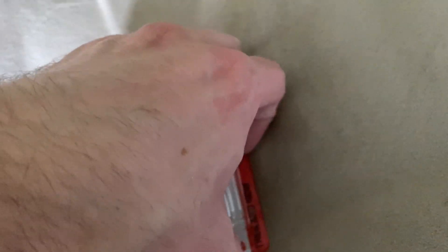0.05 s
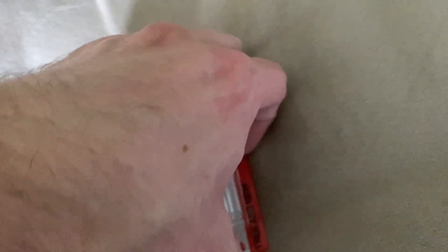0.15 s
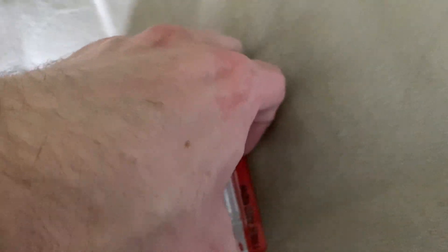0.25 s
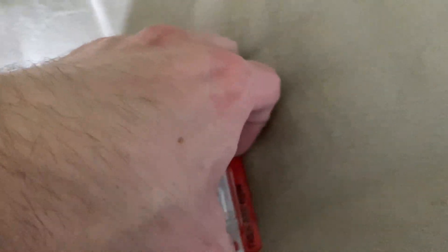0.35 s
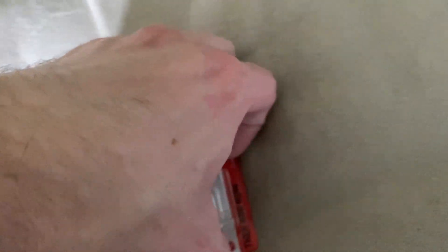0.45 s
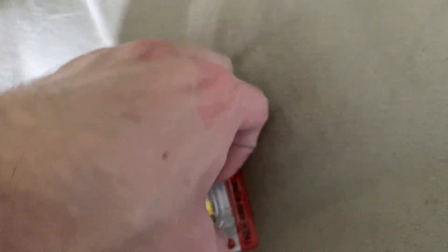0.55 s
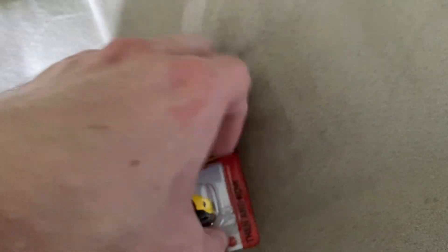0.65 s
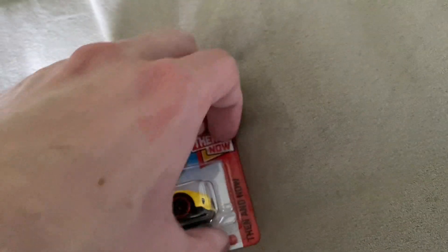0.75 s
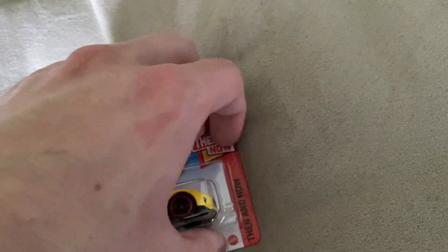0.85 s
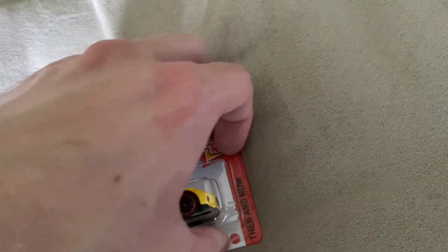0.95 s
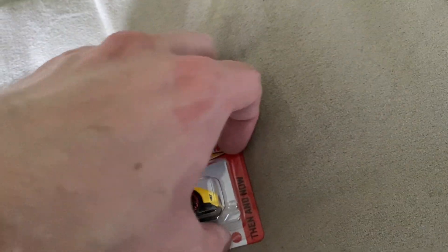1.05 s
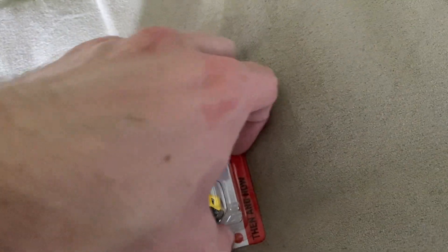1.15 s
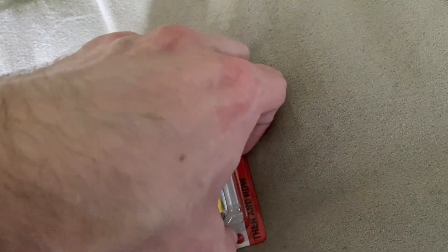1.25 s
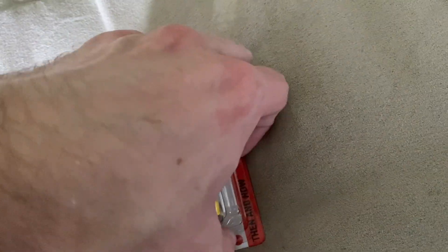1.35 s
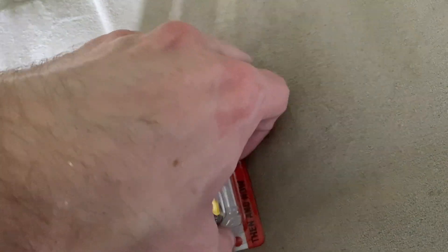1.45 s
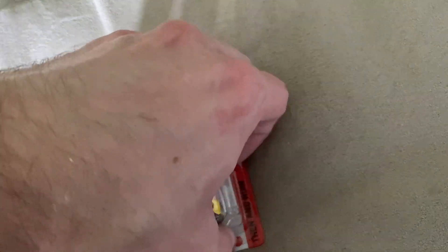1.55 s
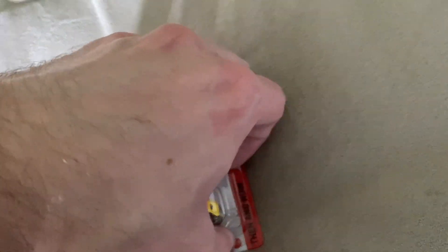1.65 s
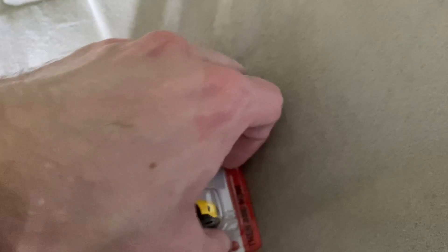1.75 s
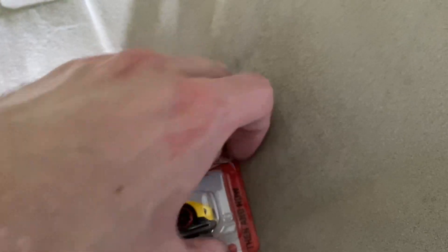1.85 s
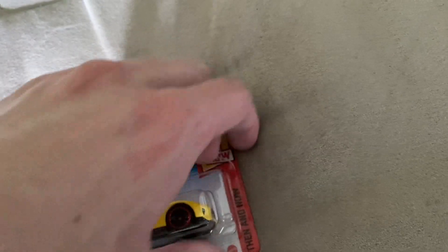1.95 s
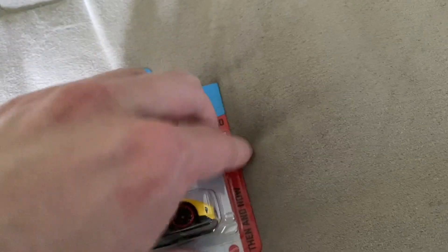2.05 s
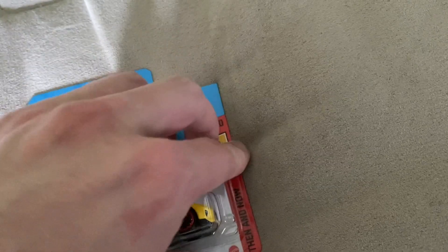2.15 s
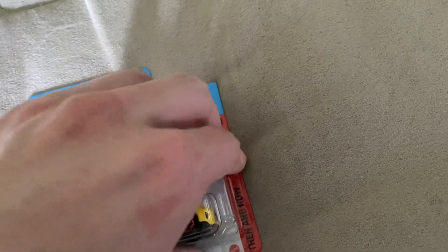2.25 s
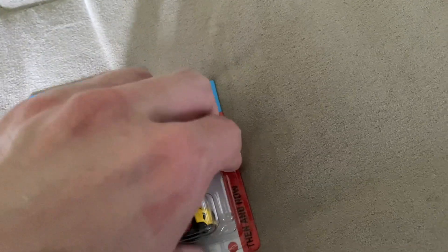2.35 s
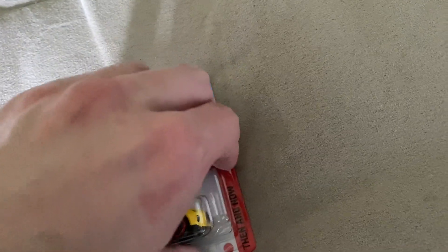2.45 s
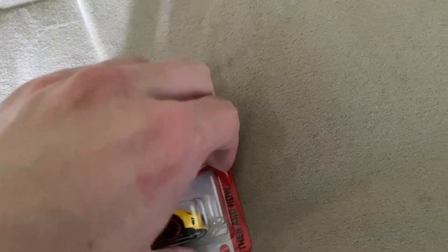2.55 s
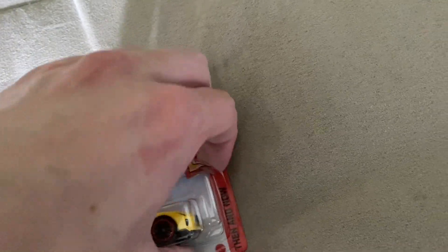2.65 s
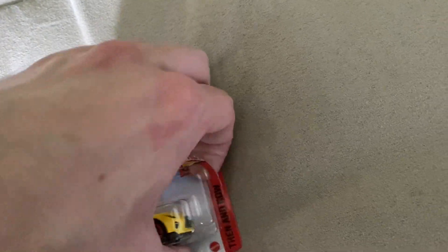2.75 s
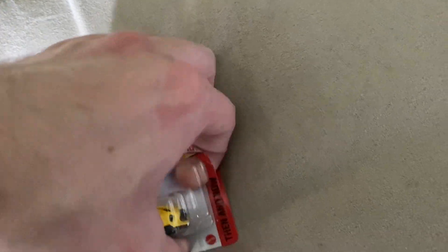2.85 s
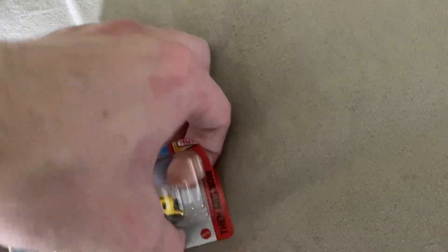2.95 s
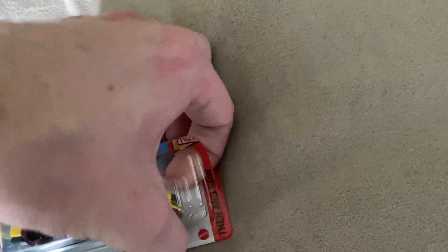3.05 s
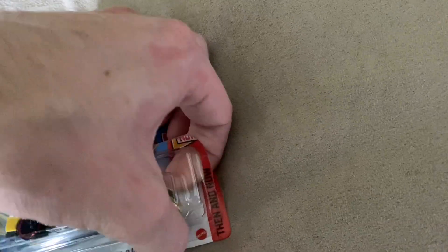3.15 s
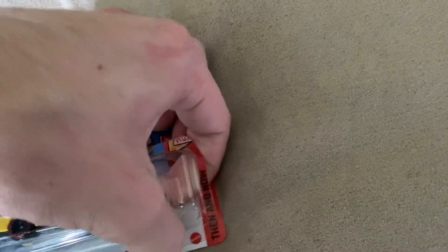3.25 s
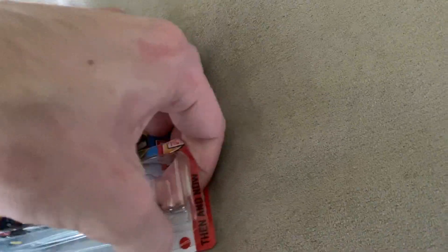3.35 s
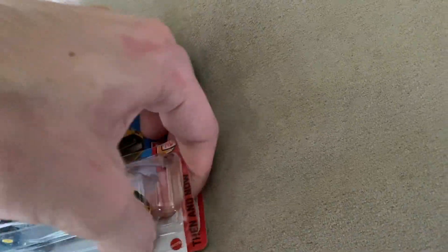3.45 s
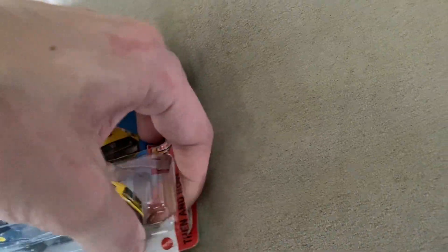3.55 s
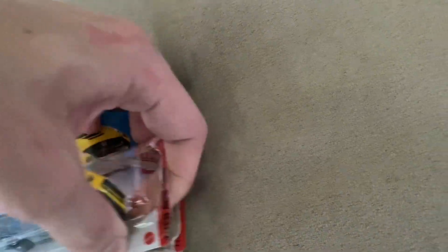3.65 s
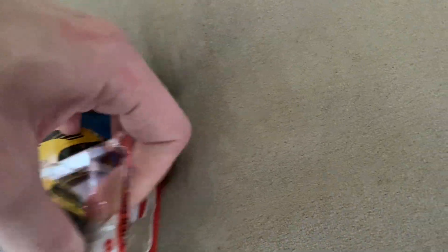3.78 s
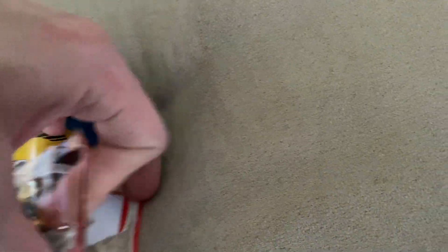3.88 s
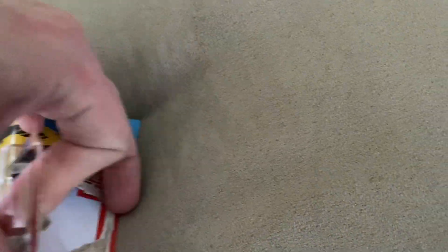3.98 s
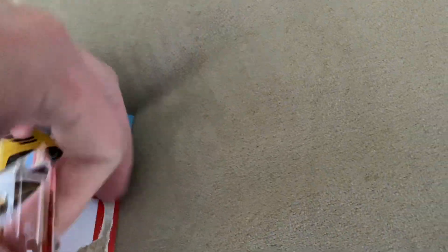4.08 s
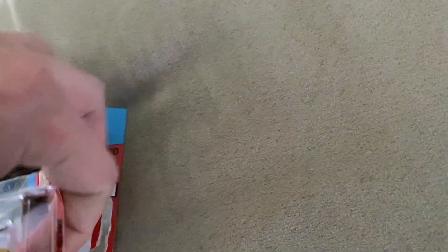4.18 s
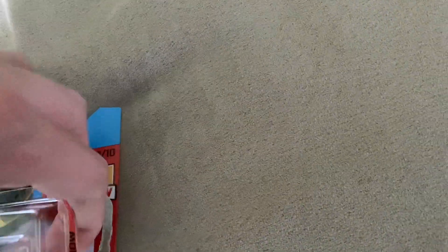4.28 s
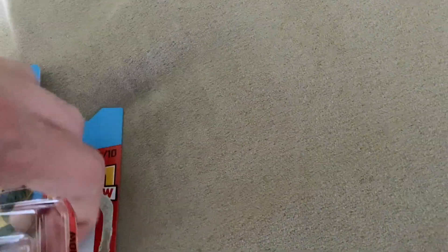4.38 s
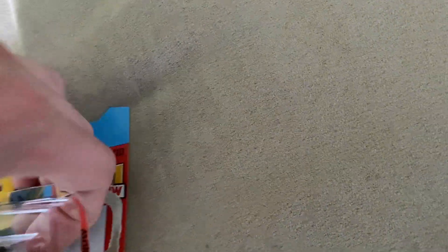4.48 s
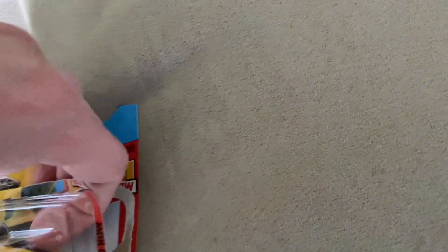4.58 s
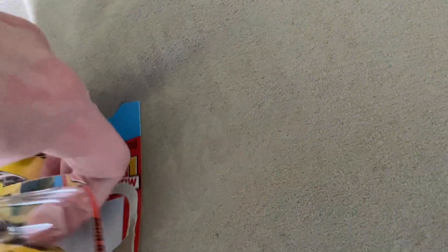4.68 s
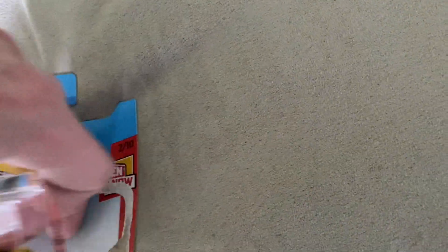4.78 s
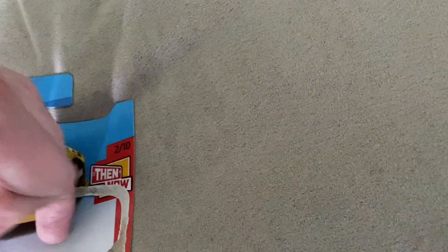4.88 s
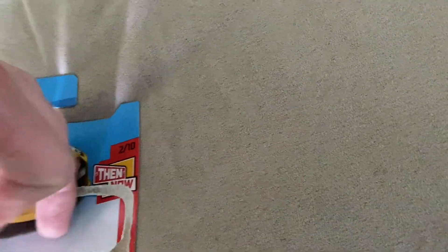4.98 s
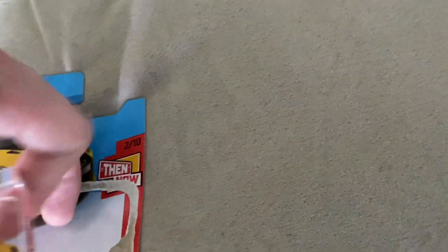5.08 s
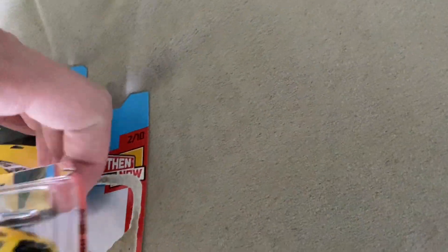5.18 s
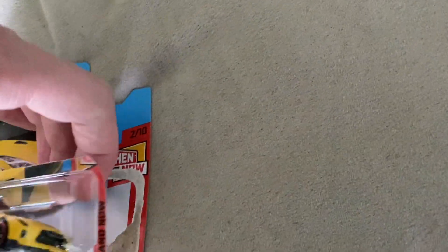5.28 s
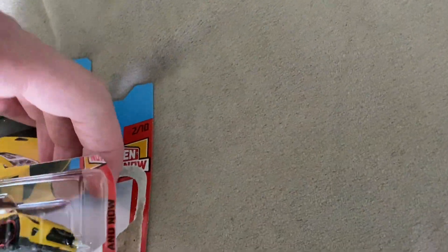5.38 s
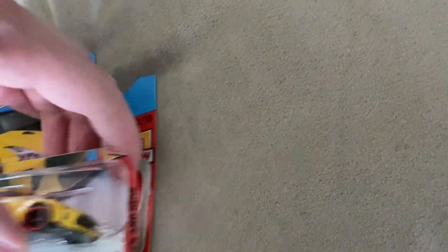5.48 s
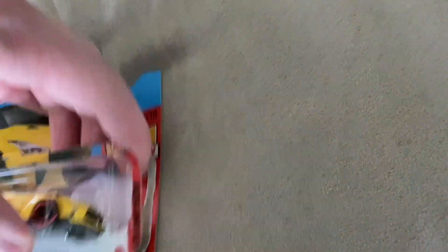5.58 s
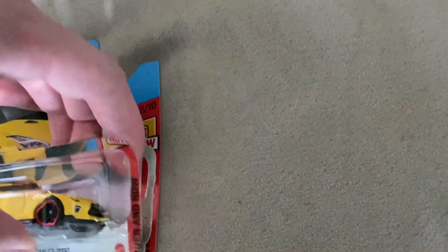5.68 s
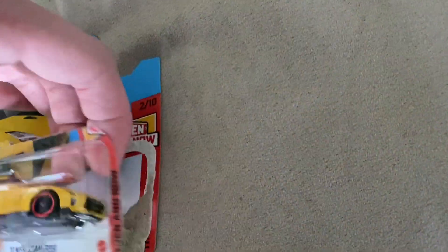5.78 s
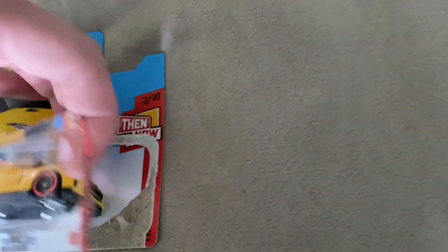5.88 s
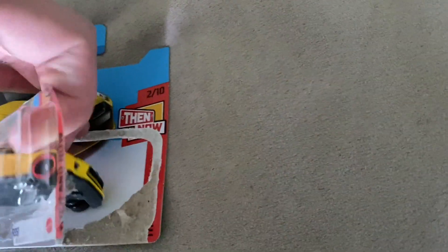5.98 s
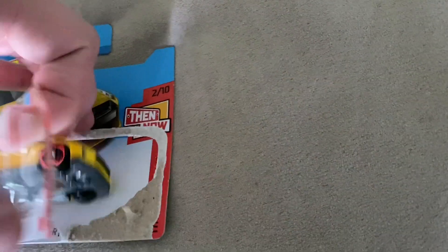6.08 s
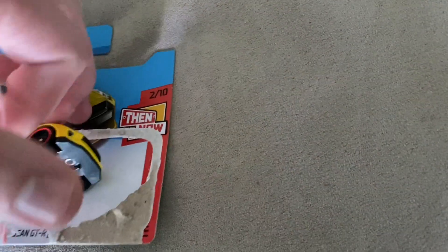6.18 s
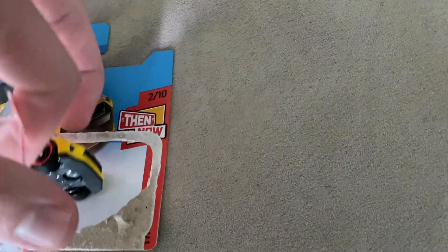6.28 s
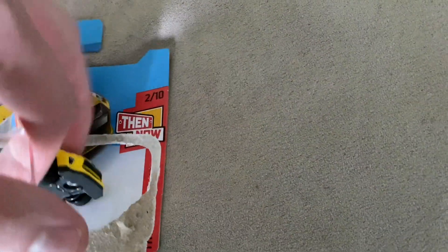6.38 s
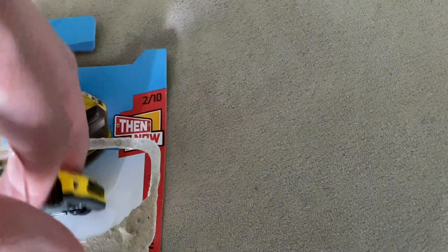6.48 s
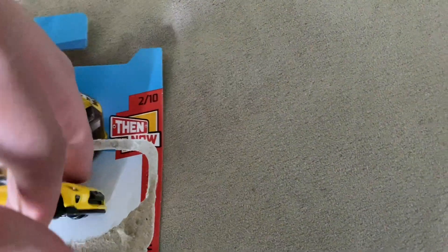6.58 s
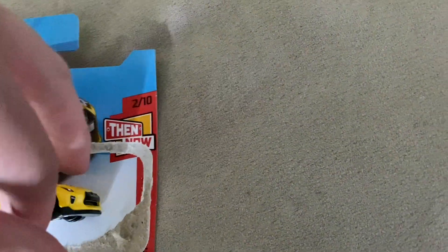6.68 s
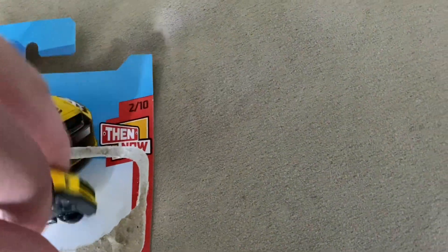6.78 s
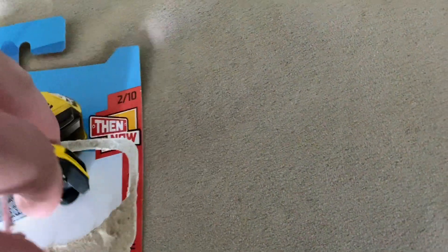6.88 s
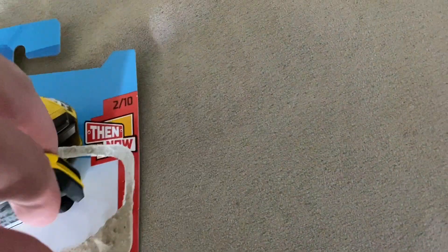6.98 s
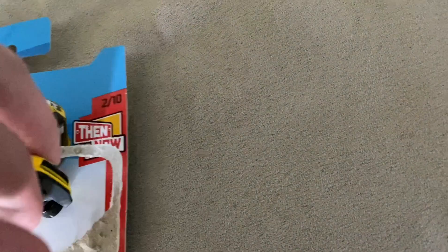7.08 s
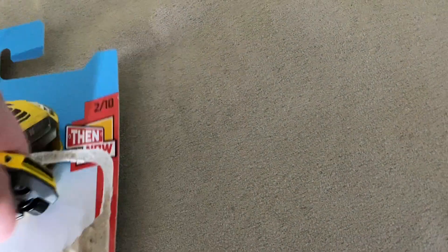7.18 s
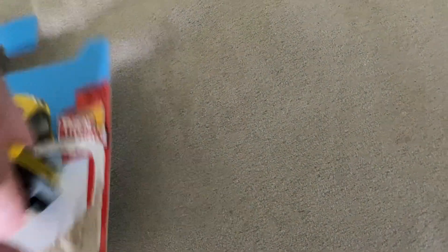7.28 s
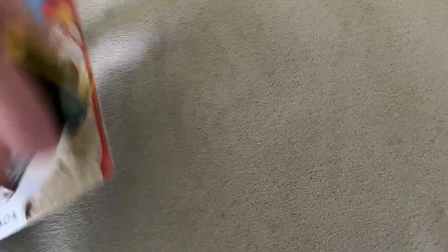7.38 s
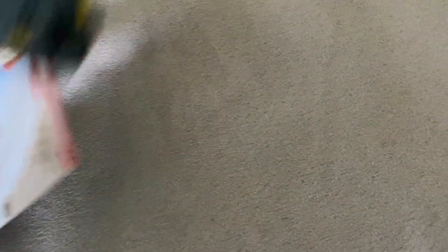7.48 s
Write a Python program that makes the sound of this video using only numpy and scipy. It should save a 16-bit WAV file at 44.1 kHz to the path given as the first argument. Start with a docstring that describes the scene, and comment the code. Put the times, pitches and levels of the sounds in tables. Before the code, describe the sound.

In a small furnished room, a stiff plastic blister is peeled from its cardboard backing right beside the microphone. An early crack and scattered ticks give way to creaking, tearing and crackling, with the loudest snap a little past halfway. The opened plastic then rubs and crinkles more softly, skin squeaks on it briefly, and a quick scrape with several snaps ends it. Faint low bumps sit underneath.

```python
"""A small furnished room: on the carpet, a hand's width from a phone, fingers peel a plastic blister off
its cardboard backing. Glue line and plastic let go in snaps and creaks that run through the sheets as
bending waves, treble first; the card rings under the hardest snaps. Fibres and skin rustle, skin squeaks
and the opened blister sings when rubbed. The phone thuds faintly in the hand, and the room answers."""
import sys
import numpy as np
from scipy import signal
from scipy.fft import rfft, irfft, next_fast_len
from scipy.io import wavfile
from scipy.ndimage import uniform_filter1d

SR = 44100
rng = np.random.default_rng(int(sys.argv[2]) if len(sys.argv) > 2 else 0)


def dump_mix(stems):
    """Bounce the given channels to the path in sys.argv[1] as a 16-bit WAV at rate SR."""
    frames = np.atleast_2d(stems).T  # one column per channel
    limited = np.clip(frames, -1, 1)  # hard clip at full scale
    pcm = np.round(limited * 32767).astype(np.int16)
    wavfile.write(sys.argv[1], SR, pcm)


N = 332205
HOP = 32  # samples per step of a power envelope


def undb(db):
    """dB to gain."""
    return 10 ** (np.asarray(db) / 20)


def unit(x):
    """Scale to rms 1."""
    return x / np.sqrt(np.mean(x ** 2))


def on_log(hz, table):
    """Read (f/Hz, value) rows on a log-frequency axis."""
    table_hz, values = np.transpose(table)
    return np.interp(np.log(hz + 1), np.log(table_hz + 1), values)


def curves(table):
    """Columns of a (t/s, ...) table, one value per sample."""
    times_s, *columns = np.transpose(table)
    return [np.interp(np.arange(N) / SR, times_s, column) for column in columns]


def shaped(x, response):
    """Filter by a complex response of frequency."""
    size = next_fast_len(x.shape[-1] + 8192)
    return irfft(rfft(x, size) * response(np.fft.rfftfreq(size, 1 / SR)), size)[..., :x.shape[-1]]


def ring(hz, centre_hz, width_hz):
    """Resonance with gain 1 at its centre."""
    return 1j * hz * width_hz / (centre_hz ** 2 - hz ** 2 + 1j * hz * width_hz)


def registers(hz, edges_hz):
    """Smooth split of the spectrum at the given edges."""
    below = [0] + [1 / (1 + (hz / edge) ** 8) for edge in edges_hz] + [1]
    return [upper - lower for lower, upper in zip(below, below[1:])]


def flutter(rate_hz):
    """Random levels joined by ramps."""
    hold = int(SR / rate_hz)
    return uniform_filter1d(np.repeat(rng.standard_normal(N // hold + 1), hold), hold)[:N]


def after(s):
    """0 before time s, then a 20 ms ramp to 1."""
    return np.clip((np.arange(N) / SR - s) / .02, 0, 1)


def swell(s, hold_s, rise_db_s, fall_db_s):
    """Power per hop: climbs to 1 at time s, holds, dies away, straight in dB."""
    t = np.arange(0, N, HOP) / SR
    return undb(-2 * (rise_db_s * np.maximum(s - t, 0) + fall_db_s * np.maximum(t - s - hold_s, 0)))


def to_gain(power):
    """Power per hop to gain per sample."""
    return np.interp(np.arange(N), np.arange(0, N, HOP), np.sqrt(power))


def add(out, s, sound):
    """Mix in at time s, early by half the bending wave's travel time."""
    start = max(int((s - BEND_MS / 2000) * SR), 0)
    out[start:start + len(sound)] += sound[:len(out) - start]


# Room noise spectrum: f/Hz, relative level/dB
AIR_SPECTRUM = [(18, -45.5), (30, -18), (64, 2), (93, -24.5), (199, -14), (252, -36), (287, -25.5),
                (461, -36), (16000, -56)]

def air(level_db=-69.5):
    """The quiet of the room: bass alike in both microphone ports, treble apart."""
    noise = rng.standard_normal((2, N))
    mid, side = shaped(noise, lambda hz: undb(on_log(hz, AIR_SPECTRUM)) * [hz ** 0, hz / (hz + 900)])
    return undb(level_db) * unit(mid + side * np.array([[1], [-1]]))


# Room decay: f/Hz, T60/s
ROOM_DECAY = [(200, 0.12), (1000, 0.12), (4000, 0.15), (12000, 0.36)]

def room(x, level_db=-37.5, onset_ms=1, size=22050):
    """Reflections: a decaying noise tail for each port, treble lasting longest."""
    t, tail = np.arange(size) / SR, 0
    for centre_hz in 125 * 2. ** np.arange(8):
        noise = shaped(rng.standard_normal((2, size)), lambda hz: ring(hz, centre_hz, centre_hz) ** 2)
        noise += (noise.mean(axis=0) - noise) * min(700 / centre_hz, 1.)  # long waves reach both alike
        tail = tail + noise * undb(-60 * t / on_log(centre_hz, ROOM_DECAY))
    tail *= 1 - np.exp(-(t * 1000 / onset_ms) ** 2)
    tail /= np.sqrt(np.sum(tail ** 2) / 2)
    return undb(level_db) * signal.fftconvolve(x[None], tail, axes=1)[:, :N]


# Port balance, before and after the pack slides: f/Hz, left minus right/dB
BALANCES = [(60, 0.0), (110, 0.0), (200, 0.0), (380, 0.0), (700, 2.0), (1290, 0.0), (2380, -1.0),
            (4400, -1.5), (8120, 0.0), (15000, 0.0)], [(60, 0.0), (110, -0.5), (200, -0.5), (380, -1.0),
            (700, 1.0), (1290, -1.0), (2380, -2.0), (4400, 1.0), (8120, 0.0), (15000, 0.0)]
# Port phase, likewise: f/Hz, left lead/rad
PHASES = ([(60, -.2), (250, -.6), (1000, -.6), (2400, -.4), (3800, -2.1), (4700, -2.2), (5700, 2.2),
          (8300, 2.6), (11600, 3.5), (15500, 4.8)], [(60, -.2), (250, -.5), (1000, -.6), (2500, -.5),
          (3050, -1.5), (3500, -.5), (5300, -.3), (5900, 1.5), (8300, 2.6), (11600, 3.5), (15500, 4.8)])

def ports(x, slide_s=3.5):
    """Two ports hear the pack with a balance and phase that change as it slides aside."""
    out, side, moved = 0, np.array([[.5], [-.5]]), after(slide_s)
    for share, balance, phase in zip((1 - moved, moved), BALANCES, PHASES):
        out += shaped(x * share,
                      lambda hz: undb(side * on_log(hz, balance)) * np.exp(1j * side * on_log(hz, phase)))
    return out


# Resting fingers: t/s, relative rustle/dB, tilt/(dB/register), phone tremor/dB
RESTING_GRIP = [(0, -83, -8, -61), (.14, -68, -8.5, -63.5), (.3, -72, -9, -64), (.6, -60.5, -4.5, -71),
                (.8, -65, -8.5, -72), (1.2, -76, -4.5, -72.5), (1.5, -71, -9.5, -63), (2.1, -61.5, -5, -64),
                (2.45, -61.5, 3.5, -80.5), (2.75, -54.5, -3.5, -70.5), (3.3, -48, 3.5, -50.5),
                (3.95, -51.5, -5, -63.5), (4.42, -59, -3, -63), (4.9, -64.5, -3.5, -62.5),
                (5.2, -68.5, 2.5, -71), (5.38, -72.5, 6, -81), (5.6, -51, -1.5, -59),
                (6.1, -62.5, 0.5, -68), (6.6, -59, -5.5, -71.5), (7.04, -83.5, -14.5, -67.5),
                (7.19, -75, .3, -56.5), (7.53, -78, -1, -64)]
# Hand thuds on the phone: t/s, level/dB
HAND_THUDS = [(.45, -50.5), (.71, -57), (0.901, -56), (1.64, -66.5), (1.78, -54.5), (2.23, -67),
              (2.272, -44.5), (2.32, -60), (2.66, -52), (3.45, -54.5), (3.58, -56.5), (4.03, -47.5),
              (4.25, -51), (4.53, -57), (4.65, -54.5), (4.96, -54), (5.03, -56.5), (5.43, -53),
              (5.56, -48.5), (6.5, -53), (6.771, -50.5), (7.38, -64)]

def handling():
    """Low tremor and thuds that the hand passes to the case, alike in both ports."""
    rumble = shaped(rng.standard_normal(N), lambda hz: ring(hz, 71, 64) ** 2)
    *_, tremor_db = curves(RESTING_GRIP)
    thuds = sum(undb(2 * db) * swell(s, 0, rise_db_s=217.5, fall_db_s=191.5) for s, db in HAND_THUDS)
    return to_gain(undb(2 * tremor_db[::HOP]) + thuds) * unit(rumble)


# Finger stops: start/s, end/s, gain/dB
FINGER_STOPS = [(2.94, 2.964, -9), (3.012, 3.029, -5), (5.191, 5.401, -3.5), (6.898, 6.935, -6.5),
                (7.023, 7.065, -11.5), (7.167, 7.198, -9.5)]

def pauses(edge_s=0.009):
    """Gain that drops while the fingers are still."""
    t = np.arange(N) / SR
    return undb(sum(db * np.clip(np.minimum(t - start, end - t) / edge_s + .5, 0, 1)
                    for start, end, db in FINGER_STOPS))


# Rubbing and tearing: t/s, hold/s, relative level/dB, tilt/(dB/register), extra card flex/dB
RUB_STROKES = [(0.347, 0.017, -56, -1, 6), (0.69, 0.0079, -57.5, -8, -3), (0.859, 0.0037, -51.5, -7, 2),
               (1.015, 0.026, -65.5, -8, -2.5), (1.361, 0.14, -59, -1, 1), (1.585, 0.015, -68, -3.5, -2.5),
               (1.753, 0.042, -58.5, 0.5, 0), (1.912, 0.11, -56, -0.5, 4), (2.112, 0.088, -62.5, 1, -14),
               (2.513, 0.18, -50.5, 1.5, 4), (2.625, 0.051, -48, 6, 20), (2.763, 0.043, -47.5, 6.5, 14.5),
               (2.89, 0.015, -53, 3, -10), (2.974, 0.0063, -48.5, 7, -5), (3.121, 0.011, -41.5, 2.5, 13),
               (3.161, 0.06, -60.5, -12, 12), (3.386, 0.032, -41, 9.5, 11), (3.599, 0.049, -55.5, -12, 7),
               (3.694, 0.16, -46.5, 8, 12.5), (4.008, 0.008, -45.5, 2, 13.5),
               (4.092, 0.064, -50.5, 3.5, 14.5), (4.239, 0.019, -44.5, -3, 1.5), (4.349, .015, -50.5, 2, 1),
               (4.499, 0.032, -45.5, 7, 9), (4.611, 0.22, -47, 6, 11), (4.952, 0.0034, -55.5, -4, 4),
               (5.052, 0.076, -65, 9.5, -9), (5.429, 0.0052, -54, -1.5, 7), (5.53, 0.024, -52.5, 0, -13),
               (5.685, 0.26, -48.5, 1.5, 1), (6.045, 0.0042, -55, -7, -1.5), (6.17, 0.13, -59.5, 4.5, -5.5),
               (6.416, 0.061, -50, 1, -9), (6.502, 0.22, -60, 2.2, -9), (6.758, 0.035, -50, -0.5, 10),
               (6.836, 0.05, -60, 3, 8), (6.981, 0.02, -61, 6.5, -11), (7.119, 0.011, -41, 3, 8.5),
               (7.245, 0.044, -43.5, 4, 4.5), (7.334, 0.038, -36.5, 3, -5), (7.363, 0.024, -33, -4.5, 1),
               (7.41, 0.021, -53, 10, -.3), (7.51, .015, -78, 10, -4), (7.53, .02, -64, -10.5, 3)]
REGISTER_DB = (-13, -4.5, -4.5, -6.5)  # card flex, card scrape, plastic scrape, fibre hiss

def rubbing(settle_db=-32, settle_tilt_db=2.5):
    """Gains of the four registers: grip, strokes and the settling after each snap add as powers."""
    step = np.arange(4)[:, None] - 1.5
    is_flex = step < -1
    grip_db, grip_tilt_db, _ = curves(RESTING_GRIP)
    power = undb(2 * (grip_db[::HOP] + step * grip_tilt_db[::HOP]))
    for s, hold_s, db, tilt_db, flex_db in RUB_STROKES:
        stroke = swell(s, hold_s, rise_db_s=302, fall_db_s=348.5)
        power += undb(2 * (db + step * tilt_db + is_flex * flex_db)) * stroke
    for s, db, *_ in PEEL_SNAPS:
        settling = swell(s, 0, rise_db_s=4200, fall_db_s=200)
        power += undb(2 * (db + settle_db + step * settle_tilt_db)) * settling
    return [undb(db) * to_gain(p) * pauses() for db, p in zip(REGISTER_DB, power)]


def sheets(hz, modes):
    """Modal response of the sheets; bending waves travel as the root of frequency, so bass comes late."""
    body = sum(undb(db) * ring(hz, centre_hz, width_hz) for centre_hz, width_hz, db in modes)
    lag_cycles = 2 * BEND_MS / 1000 * np.sqrt(1000 * hz)
    return body * np.exp(-2j * np.pi * lag_cycles)


def grains(per_s, spread_db):
    """Random tiny breaks, many small and a few large."""
    chance, sign, size = rng.random((3, N))
    size_db = np.minimum(-spread_db * np.log(1 - size), 14)
    return (chance < per_s / SR) * np.sign(sign - .5) * undb(size_db)


# Joint modes of card and blister: f/Hz, width/Hz, level/dB
PACK_MODES = [(295, 170, -8.5), (456, 230, -12.5), (648, 180, 4), (905, 520, 4.5), (1312, 550, -1),
              (1620, 330, -3.5), (2650, 1300, -0.5), (3340, 1600, -3), (3960, 530, -10), (4334, 330, -2.5),
              (5600, 1900, -12.5), (6640, 2800, 1.5), (8200, 15000, -5.5), (10800, 1600, -4.5),
              (11400, 6700, -25)]
BEND_MS = 1.3  # travel time of a 1 kHz bending wave to the free edge

def rustle(gains, pressure_db=3, swell_db=3):
    """Fibres part and skin drags: patter over hiss; each mode swells and fades as the grip shifts."""
    patter = unit(grains(per_s=1200, spread_db=3.5))
    pressure = undb(pressure_db * flutter(70))
    bands = np.zeros((4, N))
    for mode in PACK_MODES:
        centre_hz, width_hz, _ = mode
        register = np.searchsorted((600, 1900, 5500), centre_hz)
        drive = (patter + .7 * rng.standard_normal(N)) * pressure * undb(swell_db * flutter(16))
        bands[register] += shaped(drive, lambda hz: sheets(hz, [mode]) * ring(hz, centre_hz, 1.8 * width_hz))
    return sum(gain * unit(band) for gain, band in zip(gains, bands))


# Cavity of the wide-open blister: f/Hz, width/Hz, relative level/dB
CAVITY_MODES = [(921, 300, -8), (1500, 420, -4), (2720, 400, -0.5), (4410, 800, -6), (5400, 800, -13.5)]
# Cavity strength: t/s, level re plastic scrape/dB, tilt/(dB/octave)
CAVITY_LEVELS = [(2.3, -13, -2), (2.6, -16, -15.5), (3.1, -5, -4), (3.45, -10.5, -7.5), (3.8, -9.5, 6.5),
                 (4.3, -4, 7), (4.8, -4, -2), (5.1, -1, 6.5), (5.3, 2, 1.5), (5.6, -2, -1),
                 (5.9, -1.5, 0.5), (6.1, -13, 2.5), (6.22, 4.5, 3.5), (6.36, -6, 1), (6.65, -1, -2),
                 (7.0, -0.5, -1), (7.15, -12.5, -9.5), (7.45, -1.5, 5)]

def hollow(scrape, shut_pitch=.93, opens_s=3.9, drift=.025, patchy_db=3.5):
    """The rubbed blister sings in noise bands that wander as it bends and sit lower until pulled wide."""
    out, (level_db, tilt_db) = 0, curves(CAVITY_LEVELS)
    pitch = shut_pitch + (1 - shut_pitch) * after(opens_s)
    skin_catch = undb(2 * flutter(150))
    for centre_hz, width_hz, db in CAVITY_MODES:
        slow = shaped(rng.standard_normal((2, N)), lambda hz: 1 / (1 + (2 * hz / width_hz) ** 2))
        phase = 2 * np.pi * np.cumsum(centre_hz * (pitch + drift * flutter(12))) / SR
        band = unit(slow[0] * np.cos(phase) + slow[1] * np.sin(phase))
        out += band * undb(db + tilt_db * np.log2(centre_hz / 2000) + patchy_db * flutter(30))
    return out * undb(level_db) * scrape * skin_catch


# Flap hiss spectrum: f/Hz, relative level/dB
FLAP_SPECTRUM = [(300, -10), (650, -4.5), (1400, -7), (2130, 0), (2800, -15.5), (3700, 6), (4600, -3),
                 (5200, -6.5), (6200, 4), (7400, -5), (8500, -20), (15000, -36.5)]

def flap(start_s=.445, level_db=-49.5):
    """A freed flap drags back after the first loud snap: a smooth hiss that fades evenly."""
    hiss = unit(shaped(rng.standard_normal(N), lambda hz: undb(on_log(hz, FLAP_SPECTRUM))))
    return hiss * undb(level_db) * to_gain(swell(start_s, 0, rise_db_s=4000, fall_db_s=62.5))


# Skin squeaks: t/s, length/s, start f/Hz, end f/Hz, level/dB
SKIN_SQUEAKS = [(5.692, 0.041, 647, 720, -60), (5.75, 0.093, 310, 299, -55.5),
                (5.836, 0.031, 604, 807, -46.5), (5.883, 0.034, 763, 880, -70)]

def squeaks(octave_db=-1, wobble_depth=0.0193):
    """Skin on plastic: short gliding tones with an octave, unsteady in pitch and strength."""
    out, t = np.zeros(N), np.arange(N) / SR
    wobble = 1 + wobble_depth * flutter(200)
    for s, length_s, from_hz, to_hz, db in SKIN_SQUEAKS:
        along = np.clip((t - s) / length_s, 0, 1)
        phase = 2 * np.pi * np.cumsum((from_hz + (to_hz - from_hz) * along) * wobble) / SR
        arch = np.sqrt(np.abs(np.sin(np.pi * along))) * (along < 1)
        out += undb(db) * arch * (np.sin(phase) + undb(octave_db) * np.sin(2 * phase))
    return out * undb(3 * flutter(90))


# Single slips of the glue line: t/s, peak/dB
GLUE_SLIPS = [(2.958, -31), (2.965, -30), (2.976, -30.5), (2.984, -28.5), (2.994, -32), (3.007, -30),
              (3.034, -30), (3.047, -34), (3.06, -28.5), (3.081, -27), (3.153, -24), (3.157, -27),
              (3.161, -22), (3.163, -24.5), (3.175, -23.5), (3.191, -25), (3.205, -25), (3.225, -25.5),
              (3.24, -28), (3.256, -24), (3.277, -22.5), (3.319, -29), (3.328, -29), (3.339, -23.5)]
# Fast runs of slips: start/s, end/s, rate/Hz, peak/dB
SLIP_RUNS = [(2.87, 2.93, 124, -39), (3.092, 3.118, 218, -23.5), (3.124, 3.148, 312, -36.5),
             (3.279, 3.309, 176, -25), (3.342, 3.404, 220, -30), (3.658, 3.73, 310, -32)]
# Modes of the taut blister: f/Hz, width/Hz, level/dB
TAUT_MODES = [(313, 38, 3), (930, 160, 7.5), (1197, 85, 1), (2460, 460, -6.5), (3350, 490, -16),
              (4710, 190, -16.5), (8530, 3700, -18)]

def creak(fray_ms=2, detune=0.079, size=2048):
    """Stick and slip: each slip kicks the taut blister at a slightly different pitch and frays fibres."""
    out, hz, slips = np.zeros(N), np.fft.rfftfreq(size, 1 / SR), list(GLUE_SLIPS)
    for start, end, per_s, db in SLIP_RUNS:
        gap_jitter, level_jitter = rng.standard_normal((64, 2)).T
        times = start + np.cumsum(np.exp(.25 * gap_jitter)) / per_s
        slips += [(s, db + 2 * jitter) for s, jitter in zip(times, level_jitter) if s < end]
    clean, frayed = registers(hz, (1900,))
    fade = unit(np.exp(-np.arange(size) / SR * 1000 / fray_ms))
    for s, db in slips:
        noise = rng.standard_normal(size)
        fray = rfft(fade * noise) / np.sqrt(size)
        body = sheets(hz * np.exp(detune * noise[-1]), TAUT_MODES)
        kick = irfft(body * (clean + frayed * fray))
        add(out, s, undb(db) * kick / np.abs(kick).max())
    return out


# Card rings and one hand thud (2.255 s): t/s, level/dB, f/Hz, T60/s
RINGS_AND_THUD = [(.438, -24.5, 615, 0.019), (0.438, -21.5, 1300, 0.015), (.444, -29.5, 104.3, 0.071),
                  (2.255, -38, 80.3, 0.2), (3.562, -18, 885, 0.024), (3.58, -14, 797, 0.015),
                  (3.581, -25.5, 332, 0.049), (4.638, -11.5, 1243, 0.028), (7.258, -33.5, 333, 0.13),
                  (7.281, -36.5, 700, 0.2), (7.332, -31.5, 334.5, 0.073), (7.334, -23, 675, 0.16),
                  (7.334, -25, 1483, 0.078), (7.381, -21, 3250, .04)]

def booms(size=4096):
    """Damped sines: the card rings under the hardest snaps, and the hand gives the phone one deep thud."""
    out, t = np.zeros(N), np.arange(size) / SR
    for s, db, hz, t60_s in RINGS_AND_THUD:
        add(out, s, undb(db - 60 * t / t60_s) * np.sin(2 * np.pi * hz * t))
    return out


def crackles(scrape, count=90, start_s=2.4, end_s=5.0, over_scrape_db=10, spread_db=1.5):
    """Tearing sets off small snaps at random times; they follow the scrape, each on a random mode."""
    thump_db, crack_db, burst_ms, cap_db = -15.5, 4.5, 1.5, -30
    rows = []
    for when, size, mode in rng.random((count, 3)):
        s = start_s + when * (end_s - start_s)
        db = 20 * np.log10(scrape[int(s * SR)]) + over_scrape_db - spread_db * np.log(1 - size)
        ring_hz = PACK_MODES[2 + int(8 * mode)][0]
        rows.append((s, min(db, cap_db), ring_hz, thump_db, crack_db, burst_ms))
    return snaps(rows)


# Glue and plastic letting go: t/s, mid peak/dB, ring f/Hz, thump re mid/dB, crack re mid/dB, burst/ms
PEEL_SNAPS = [(0.338, -38.5, 1090, -21, 5.5, 12), (0.345, -41, 990, -13, -33, 3.3),
              (0.387, -55.5, 1410, -15, 14, 3.2), (0.4288, -21, 5200, -39, 0, 7.2),
              (0.437, -5, 3970, -17.5, -1, 1.85), (0.438, -22.5, 5200, -31, -3.5, 2.8),
              (0.661, -32.5, 1500, -8, -24, 1.1), (0.68, -31, 920, -7.5, -28, 1),
              (0.869, -37.5, 742, 5.5, -64, 0.24), (0.942, -47, 840, -2.5, -41, 2.5),
              (1.377, -48, 770, -3, 8, 1.33), (1.419, -46.5, 1000, -9, 0, 1.4),
              (1.449, -48, 1500, -8.5, 4, 1.7), (1.48, -43.5, 1570, -6.5, -6, 2.4),
              (1.582, -40.5, 856, -10, -8.5, 2.6), (1.728, -42.5, 1500, -9, -9, 1.6),
              (1.773, -35.5, 820, -20, -1.5, 5), (1.882, -23, 1910, -34, -0.5, 1.24),
              (1.941, -25.5, 1630, -16.5, -2, 3.6), (2.077, -46.5, 1130, -4, -42, 4.2),
              (2.159, -43, 755, -6.5, -37, 0.7), (2.34, -39, 1610, -36, 8, 1.4),
              (2.417, -53.5, 2970, -30, 17, 1.5), (2.512, -44.5, 1640, -17, 10, 3.5),
              (2.581, -30, 1100, -14, 7.5, 1.9), (2.656, -31, 860, -12, 5, 1.9),
              (2.7, -36, 2620, -28, 7, 3.9), (2.757, -40, 720, -15, 5, 16),
              (2.885, -45, 918, -10, -14, 3.9), (2.927, -38.5, 950, -10, -7, 2.7),
              (3.101, -39, 937, -8, -19, 0.99), (3.374, -35, 865, -14, 18, 2.6),
              (3.394, -35.5, 1030, -18, 20, 1.8), (3.412, -27, 3030, -13, 5, 3.2),
              (3.415, -23.5, 760, -12, 5.5, 4.8), (3.444, -30.5, 850, -17, 3, 6),
              (3.56, -15.5, 1007, -22, 3, 2), (3.579, -14, 856, -11.5, 8.5, 0.47),
              (3.701, -25, 818, -14, 2, 4), (3.738, -32, 2670, -26, 6, 5.4),
              (3.796, -32.5, 2457, -14.5, 7, 5.5), (3.895, -38, 887, -9.5, 6.5, 20),
              (3.918, -33.5, 883, -11.5, 7, 1.3), (4.039, -27.5, 1650, -8.5, -40, 1.5),
              (4.082, -33, 2560, -8, -6, 13), (4.12, -34.5, 2700, -14, -8, 5),
              (4.211, -25, 2500, -13, -8, 2.8), (4.24, -23, 1050, -21, -5, 2.7),
              (4.246, -25.5, 2710, -10, -7, 7.5), (4.276, -29.5, 1180, -6.5, -4, 3),
              (4.358, -30.5, 890, -13, -12, 1.3), (4.488, -27.5, 2560, -32, -6, 2.2),
              (4.553, -30, 4660, -21, 2, 6), (4.621, -28, 2600, -30, -13, 19),
              (4.635, -8.5, 2450, -24, 1, 4.5), (4.64, 0, 2610, -20.5, -27, 0.55),
              (4.65, -23, 4800, -17, 12, 6), (4.667, -18, 1490, -37, -10, 1.2),
              (4.701, -22.5, 2820, -21, -5, 3.7), (4.747, -29.5, 2300, -12.5, 0, 32),
              (4.804, -35.5, 2390, -18, -16, 1.6), (4.858, -29.5, 4580, -16.5, 1, 3),
              (4.936, -25.5, 2630, -37, -3, 0.54), (4.942, -21, 2180, -13.5, -5, 4.4),
              (4.999, -36, 1530, -11.5, -10, 4.2), (5.162, -44.5, 886, -13, -14, 1.5),
              (5.4, -46.5, 900, -13.5, -19, 1.6), (5.414, -33, 885, -8.5, -14, 1.9),
              (5.435, -35.5, 930, -7, -27, 2.4), (5.491, -36.5, 2500, -13, -2.5, 31),
              (5.538, -29, 1020, -11.5, -0.5, 9.7), (5.547, -30, 820, -4.5, -3, 3.8),
              (5.595, -42, 900, -1.5, -20, 1.4), (5.663, -31.5, 940, -14.5, -9.5, 7),
              (5.949, -40, 2670, -6.5, 3, 2.1), (5.98, -48, 2080, -12, 0, 1.8),
              (6.05, -31.5, 925, -24, 4.5, 7.9), (6.225, -42, 1620, -16.5, -11, 2.6),
              (6.294, -36, 4900, -45, 3.5, 5.1), (6.42, -39.5, 4600, -27, -1, 2.4),
              (6.434, -34, 2720, -39, -3.5, 2.9), (6.556, -41.5, 1440, -13, -6, 3.5),
              (6.64, -39.5, 2570, -34, -9, 2.9), (6.736, -20.5, 5750, -30.5, 4, 5.3),
              (6.806, -42, 3920, -24, -6, 3.4), (6.842, -45.5, 4500, -29.5, 8, 1.5),
              (7.258, -27, 850, -10, -4, 3.5), (7.28, -23, 690, -34, 1, 4.7),
              (7.296, -31.5, 710, -10, 9, 2.9), (7.314, -29, 2570, -29, 6, 4),
              (7.332, -18, 660, -9.5, -0.5, 0.63), (7.335, -23, 3200, -34, -21, 11),
              (7.38, -10.5, 3260, -24.5, 3.5, 3.9), (7.388, -17, 690, -25, 16.5, 1.6),
              (7.407, -28, 620, -10.5, -5, 1.5), (7.441, -39, 4370, -25, -7, 2),
              (7.46, -33, 3860, -35, -5, 5), (7.465, -38, 2600, -31, -10, 2.7),
              (7.501, -38.5, 3760, -18, -11, 11)]

def snaps(rows, rise_ms=0.16, ring_db=9, dulling=0.093, thump_lag_ms=3, size=4096):
    """A dying volley of breaks rings the pack and cracks in the treble; the card bends once and thumps."""
    out, t_ms, hz = np.zeros(N), np.arange(size) / SR * 1000, np.fft.rfftfreq(size, 1 / SR)
    body = sheets(hz, PACK_MODES)
    # The card's slower wave slides the thump down in pitch, onto a low ring.
    sag = np.exp(-2j * np.pi * thump_lag_ms / 1000 * (2 * np.sqrt(1000 * hz) - hz))
    sag *= 1 + undb(1) * ring(hz, 215, 100)
    for s, db, ring_hz, thump_db, crack_db, burst_ms in rows:
        breaks, spread = rng.standard_normal((2, size))
        fade = np.exp(-t_ms / burst_ms) * (1 - np.exp(-t_ms / rise_ms))
        volley = rfft(breaks * undb(2 * spread) * fade)
        own_ring = 1 + undb(ring_db) * ring(hz, ring_hz, 0.14 * ring_hz)
        top_hz = 5000 * undb(dulling * min(crack_db, 0))  # a weak crack also dulls the mid register
        low, middle, high = (band * body for band in registers(hz, (600, top_hz)))
        mid = irfft(volley * middle * own_ring)
        thump = irfft(rfft(fade) * low * sag)
        crack = irfft(volley * high)
        for part, part_db in ((mid, 0), (thump, thump_db), (crack, crack_db)):
            add(out, s, undb(db + part_db) * part / np.abs(part).max())
    return out


def scene():
    """The pack at the ports and through the room, over handling and air."""
    gains = rubbing()
    plastic_scrape = gains[2]
    near = snaps(PEEL_SNAPS) + booms() + creak() + rustle(gains)
    near += hollow(plastic_scrape) + flap() + crackles(plastic_scrape) + squeaks()
    return ports(near) + room(near) + handling() + air()


def record(dry):
    """The loudest peaks are softly limited and the top treble is cut."""
    ceiling, top_hz = .88, 15700
    lowpass = signal.ellip(8, .2, 80, top_hz, fs=SR, output="sos")
    return ceiling * signal.sosfilt(lowpass, np.tanh(dry / ceiling))


dry = scene()
out = record(dry)
dump_mix(out)
```